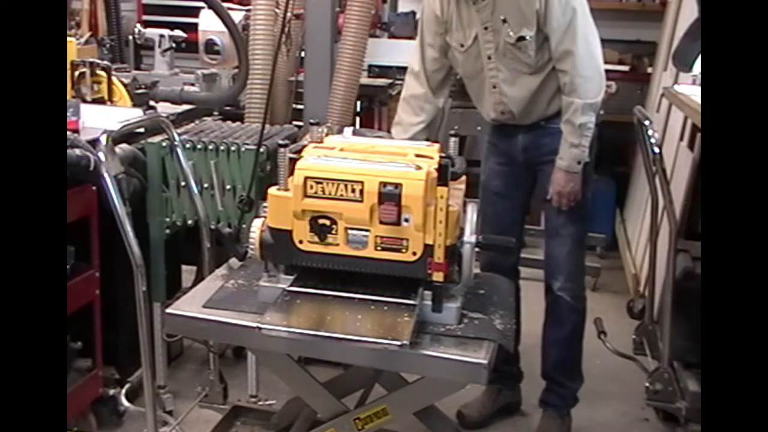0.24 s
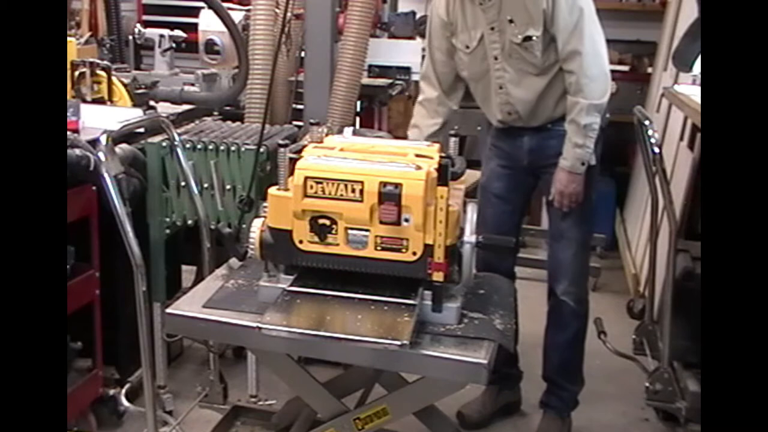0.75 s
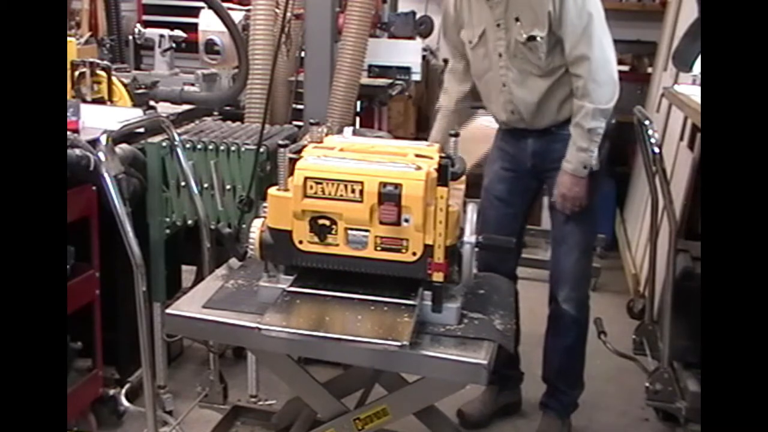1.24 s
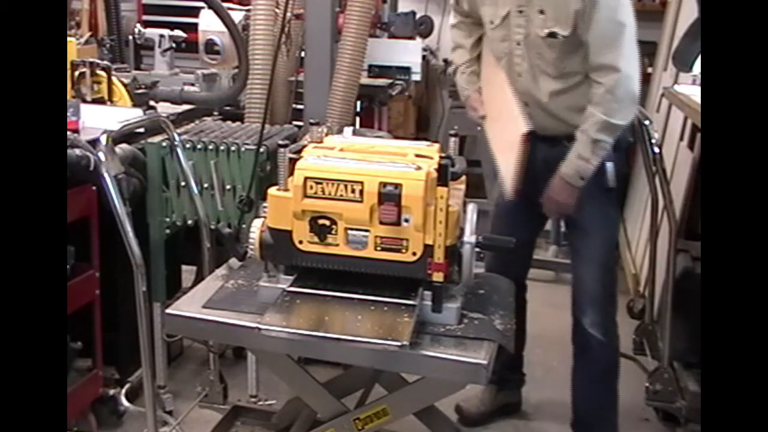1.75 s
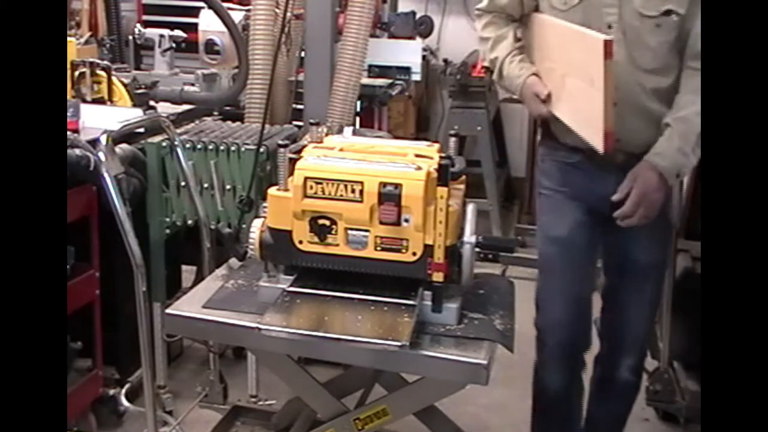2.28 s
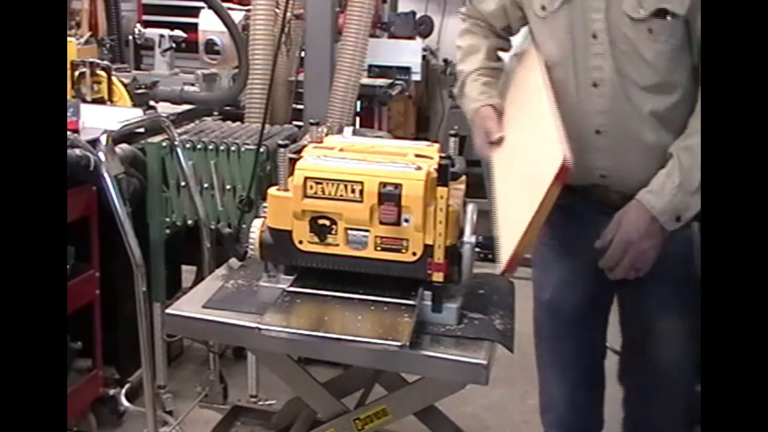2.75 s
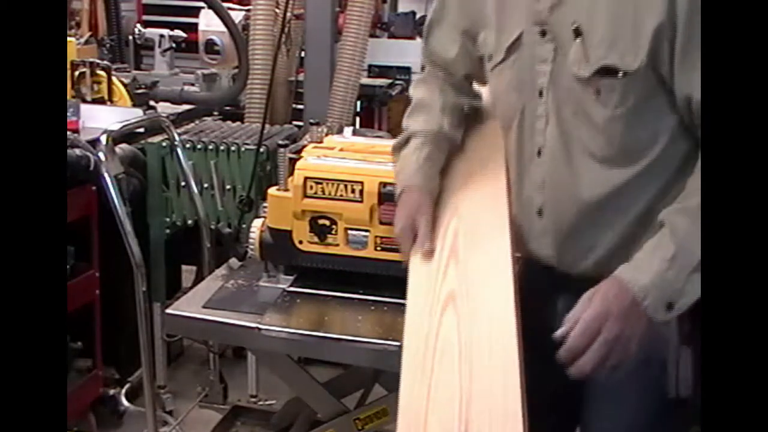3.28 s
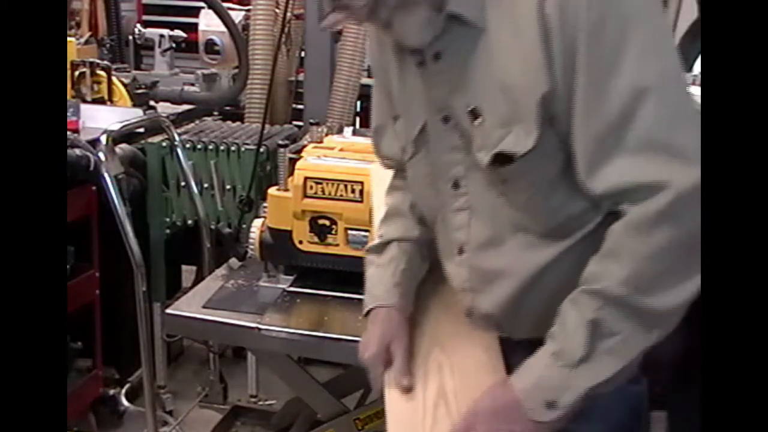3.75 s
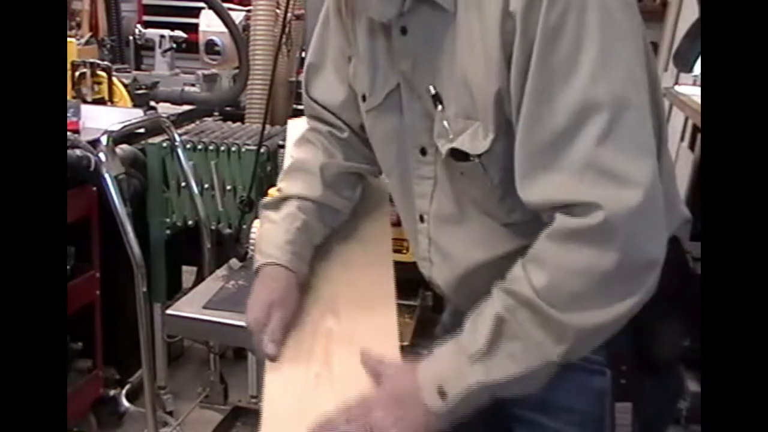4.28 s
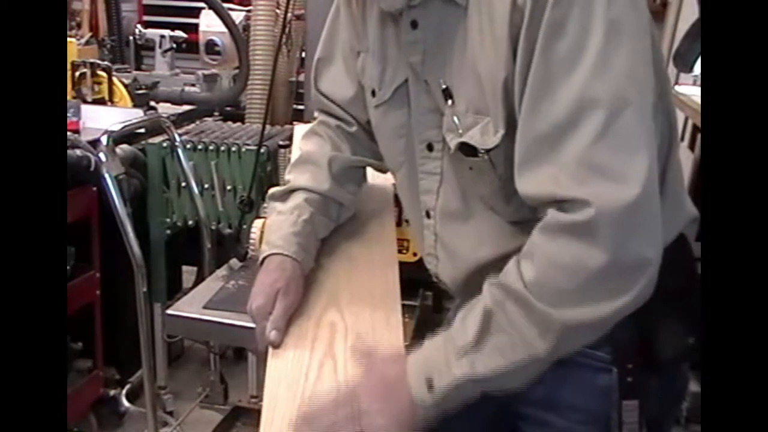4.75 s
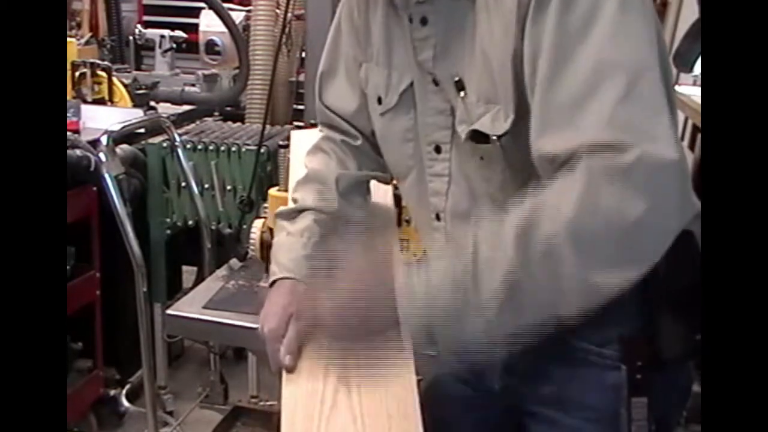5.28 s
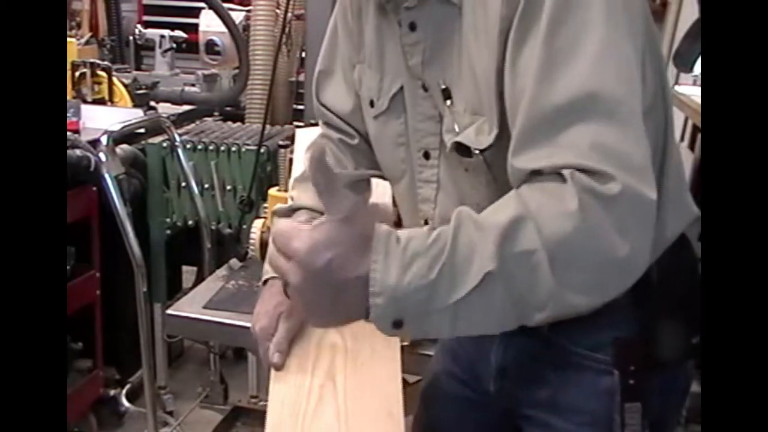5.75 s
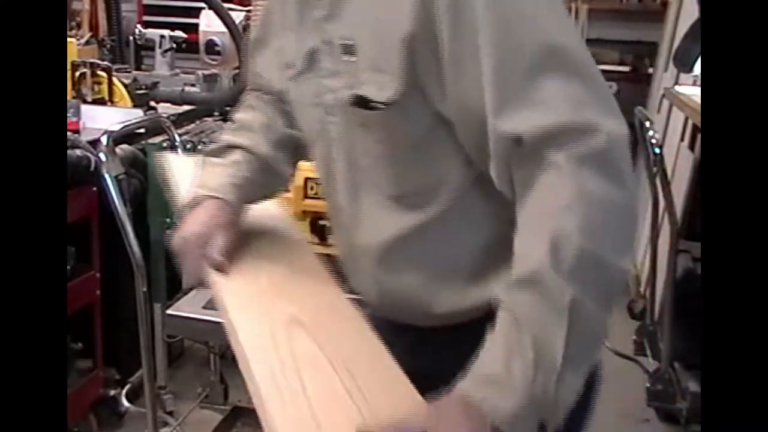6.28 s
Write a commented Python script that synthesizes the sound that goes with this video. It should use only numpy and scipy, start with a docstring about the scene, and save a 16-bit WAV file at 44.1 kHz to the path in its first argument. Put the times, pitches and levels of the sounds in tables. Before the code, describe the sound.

Loud planer whine in a small workshop: a brief cutting rasp, the pitch climbing slightly, then constant free-running drone and airy hiss.

```python
"""A benchtop thickness planer runs in a small workshop: at first the board's tail end rasps off its knives.
Three knives beat the air into a loud whine that climbs as the speed recovers; chips roar in the chute.
The belted motor hums at its turning rate and whistles at multiples of it, while its fan blows turbulent
noise through the casing and narrow resonant bands sing in the slots. A worker walking round with the board
shifts the standing waves of the whine, and a few seconds in shades the treble."""
import sys
import numpy as np
from scipy import signal
from scipy.fft import rfft, irfft, next_fast_len
from scipy.io import wavfile

SR = 44100
rng = np.random.default_rng(int(sys.argv[2]) if len(sys.argv) > 2 else 0)


def wav_record(signal):
    """Record a signal, one row per channel, as 16-bit PCM in the file named by sys.argv[1]."""
    frames = np.transpose(np.atleast_2d(signal))
    bounded = np.clip(frames, -1, 1)
    # unit amplitude maps onto the largest positive 16-bit level
    quanta = np.round(bounded * 32767).astype(np.int16)
    wavfile.write(sys.argv[1], SR, quanta)


N = 287532
T = np.arange(N) / SR   # s

KNIFE_HZ = 513.7   # knife passes per second at free speed
SAG_HZ, RECOVERY_S = 16.3, .47   # pass rate lost under load at the start, and its return time
ROOM_MODE_HZ, ROOM_MODE_WIDTH_HZ = 510.9, 4.0   # a standing wave that the fundamental sweeps through
LOAD_PEAK_S, LOAD_RISE_S, LOAD_FADE_S = .12, .2, .4
MOTOR_PER_KNIFE = .6507   # motor turns per knife pass
LOW_ORDER, MID_ORDER, TOP_ORDER = 8, 16, 21   # whistles, in multiples of the motor turn
WHISTLE_WANDER_DB = 1.2
AIR_DB, OPPOSED_DB = -24.5, -11.5   # broadband noise as a whole; scale of its part in opposite phase
HISS_FROM_HZ, TOP_FROM_HZ = 2000, 5200   # taken to the nearest third-octave patch
SHADE_S, SHADE_RISE_S = 4.15, .08   # the body comes to block the direct path
SHADE_TOP_DB = -2.5   # topmost hiss against the rest once shaded
ROOM_T60_S, ROOM_DB = .25, -13
SLOT_WAVER_DB, ROAR_GUST_DB = 1.8, 1.8
CUT_END_S, CUT_RISE_S = 0.13, 0.12
CUTOFF_HZ = 15650


def from_db(db):
    """Level is logarithmic: 20 dB is a tenfold amplitude."""
    return 10 ** (np.asarray(db) / 20)


def rms_one(x):
    """Mean-square normalisation: scale to unit power."""
    return x / np.sqrt(np.mean(x ** 2) + 1e-20)


def in_time(rows):
    """Linear interpolation of a table's columns, sample by sample."""
    s, *columns = np.transpose(rows)
    return [np.interp(T, s, column) for column in columns]


def drift(rate_hz):
    """Low-passed chance: coarse noise twice through a one-pole filter, scaled to spread 1."""
    step = 40   # samples per coarse point
    pole = np.exp(-2 * np.pi * rate_hz * step / SR)
    noise = rng.standard_normal(N // step + 2002)
    slow = signal.lfilter([1], [1, -2 * pole, pole * pole], noise)[2000:]
    return np.interp(np.arange(N) / step, np.arange(len(slow)), rms_one(slow - slow.mean()))


def bell(hz, centre_hz, width_hz):
    """Power curve of a simple resonance, 1 at its centre."""
    return 1 / (1 + (2 * (hz - centre_hz) / width_hz) ** 2)


def resonant_noise(centre_hz, width_hz):
    """Resonance colours noise: white noise twice through one resonance, at unit power."""
    size = next_fast_len(N)
    hz = np.arange(size // 2 + 1) * SR / size
    spectrum = rfft(rng.standard_normal(size)) * bell(hz, centre_hz, width_hz)
    return rms_one(irfft(spectrum, size)[:N])


def lean(x, pan_db):
    """Interaural level difference places a sound between left and right."""
    return x * from_db(np.array([pan_db, -pan_db]) / 2)


def slowed():
    """Exponential relaxation: 1 under load, dying to 0 as the machine frees itself."""
    return np.exp(-T / RECOVERY_S)


def knife_phase():
    """Phase is the integral of frequency: knife passes while the freed cutter head spins back up."""
    return 2 * np.pi * np.cumsum(KNIFE_HZ - SAG_HZ * slowed()) / SR


def knives(phase, near):
    """Periodic puffs form a harmonic series; moving reflections make its overtones wander in phase."""
    # knife tone in the room's standing waves: t/s, level of orders 1 to 4/dB
    whine_levels = [(0.03, -16, -42, -29.5, -52), (0.1, -15.5, -39, -38, -54), (0.15, -15, -25.5, -34, -61),
                    (0.24, -16, -26.5, -33, -42), (0.33, -14.5, -24.5, -29.5, -36.5),
                    (0.55, -15.5, -28, -27, -37.5), (0.66, -15.5, -26.5, -28, -33.5),
                    (0.76, -15, -27, -38, -34.5), (0.86, -15, -25, -31.5, -31.5),
                    (0.96, -16, -25.5, -30.5, -32.5), (1.11, -16, -25, -29, -29.5),
                    (1.3, -17.5, -23.5, -30, -28.5), (1.77, -17.5, -25.5, -25.5, -28),
                    (1.97, -14.5, -26.5, -33, -32), (2.62, -16.5, -24.5, -28, -29.5),
                    (3.44, -16, -24.5, -30, -33), (3.53, -16, -26.5, -27.5, -30),
                    (3.62, -16, -26, -38, -31.5), (3.84, -15.5, -25.5, -29.5, -26.5),
                    (4.02, -15, -29, -34.5, -34), (4.05, -14.5, -26, -45, -30.5),
                    (4.16, -15, -27, -29.5, -29), (4.95, -16, -24, -33.5, -31),
                    (5.56, -14.5, -24.5, -29, -30), (5.98, -14.5, -25, -31.5, -31.5),
                    (6.05, -15, -26, -39.5, -33), (6.3, -14, -28.5, -30, -33.5),
                    (6.43, -14.5, -28, -33, -32), (6.48, -14, -29, -36, -34.5)]
    # left-right lean of the knife fundamental: t/s, lean/dB
    fundamental_lean = [(0.03, 3.3), (0.14, 1.8), (0.4, 1.8), (1.1, -1.7), (1.8, -1.7), (2.0, -.6),
                        (2.5, -.7), (2.75, -1.6), (3.35, -.2), (4.0, -1.1), (4.25, -.7), (6.48, -.2)]
    # lean of orders 2 to 4: at rest/dB, added while slowed/dB, added by the near worker/dB, wander/dB
    overtone_leans = [(1.1, -1.5, 4.5, 0.1), (-0.5, 11, 2, 2.5), (0.5, -5, 0.4, 0)]
    pans_db = in_time(fundamental_lean)
    for rest_db, slow_db, near_db, wander_db in overtone_leans:
        pans_db.append(rest_db + slow_db * slowed() + near_db * near + wander_db * drift(1.4))
    pass_hz = np.gradient(phase) * SR / (2 * np.pi)
    mode_phase = np.arctan(2 * (pass_hz - ROOM_MODE_HZ) / ROOM_MODE_WIDTH_HZ)
    through_mode = mode_phase - mode_phase[-1]   # the fundamental falls behind as it passes the standing wave
    out = 0
    for k, (level_db, pan_db) in enumerate(zip(in_time(whine_levels), pans_db)):
        wander = .19 * k ** 2 + .2 * k * drift(.8)   # overtones lean ahead, so the puff is lopsided
        if k == 0:
            wander = wander - through_mode
        # the two ports sit apart in the standing wave
        skew = np.array([[.1], [-.1]]) * (1 + 0.15 * k * drift(0.73))
        flutter = from_db((0.3 + 0.35 * k) * drift(13.0) + 0.3 * k * drift(3.0))
        tone = np.sqrt(2) * np.cos((k + 1) * phase + wander + skew)
        out = out + lean(from_db(level_db) * flutter * tone, pan_db)
    return out


def unequal_knives(phase, near):
    """Broken symmetry: unequal knives repeat only once a turn, adding multiples of the cutter turn."""
    # multiple of cutter turn, free level/dB, added as the board tips off/dB, added by the near worker/dB
    turn_orders = [(1, -58, 0, 0), (5, -50, 19, 6), (15, -52, 11, 1), (44, -60, 4, 0)]
    late = T - LOAD_PEAK_S
    load = np.exp(np.where(late < 0, -(late / LOAD_RISE_S) ** 2, -late / LOAD_FADE_S))
    out = 0
    for order, free_db, load_db, near_db in turn_orders:
        waver_db = 2.6 * (1.3 - load) * drift(2.5)   # steadier under load
        level_db = free_db + load_db * load + near_db * near + waver_db
        out = out + np.sqrt(2) * from_db(level_db) * np.cos(order * phase / 3)
    return out


def motor(phase):
    """Rotating unbalance hums once and twice a turn; fan blades and slots add thin higher orders."""
    # hum once a turn: t/s, level/dB
    hum_levels = [(0.03, -42), (0.12, -33), (0.84, -32.5), (0.95, -27.5), (1.83, -29), (1.86, -32.5),
                  (2.69, -29.5), (2.94, -31), (4.25, -26.5), (4.29, -29.5), (5.99, -28), (6.39, -30),
                  (6.43, -27), (6.48, -30)]
    # hum twice a turn: t/s, level/dB
    second_hum_levels = [(0, -49), (.25, -45), (1.5, -46), (2.5, -50), (2.66, -40), (3.0, -44), (3.3, -50),
                         (6.5, -50)]
    # the lowest whistle swells under load and again as the worker bends over the board: t/s, level/dB
    low_levels = [(0, -44), (.2, -37.5), (.45, -37), (.68, -48), (.88, -42), (1.1, -48), (1.5, -52),
                  (3.4, -51), (3.8, -43.5), (4.15, -44), (4.45, -49), (4.8, -44), (5.3, -43.5),
                  (5.8, -39.5), (6.1, -42), (6.4, -46)]
    # the middle fan whistle: free level/dB, swell/dB, swell peak/s, swell width/s
    mid_swell = (-51.5, 16, .2, 0.24)
    # the highest whistle comes and goes: t/s, level/dB
    top_levels = [(0, -52), (.5, -50), (1.07, -41), (1.5, -48), (2.0, -52), (2.8, -49), (4.0, -52),
                  (4.3, -59), (5.0, -53), (5.9, -49), (6.1, -56), (6.5, -56)]
    turn = MOTOR_PER_KNIFE * phase
    out = from_db(in_time(hum_levels)[0] + 0.51 * drift(12.0)) * np.cos(turn)
    out = out + from_db(in_time(second_hum_levels)[0] + 3.0 * drift(8.5)) * np.cos(2 * turn)
    low_db = in_time(low_levels)[0] + 1.5 * drift(10.0)
    out = out + from_db(low_db) * np.cos(LOW_ORDER * turn + 0.3 * drift(12))
    free_db, swell_db, peak_s, width_s = mid_swell
    mid_db = free_db + swell_db * np.exp(-((T - peak_s) / width_s) ** 2)
    mid_db = mid_db + WHISTLE_WANDER_DB * drift(1.2) + 1.5 * drift(14)
    out = out + from_db(mid_db) * np.cos(MID_ORDER * turn + 0.3 * drift(12))
    top_db = in_time(top_levels)[0] + 2.9 * drift(9.6)
    out = out + from_db(top_db) * np.cos(TOP_ORDER * turn + 0.4 * drift(12))
    return np.sqrt(2) * out


def air(phase, *levels_db):
    """Turbulence is broadband noise, here in third-octave patches; each knife puffs the hiss a little."""
    # turbulent air heard alike in both ears: f/Hz, relative level per Hz/dB
    rush_curve = [(30, -38), (90, -28), (130, -16.5), (240, -7.5), (380, -4), (600, 0), (1100, -2),
                  (1900, -5.5), (2500, -7.5), (3400, -8), (4500, -5.5), (6500, -10), (7570, -15),
                  (7640, -28), (8300, -33), (9000, -46), (15500, -54)]
    # noise in opposite phase between the ears, with a step up above 7.6 kHz: f/Hz, relative level per Hz/dB
    opposed_curve = [(30, -33), (90, -40.5), (240, -12), (600, -3), (1300, 2.5), (2500, -5.5),
                     (5000, -10.5), (7500, -24), (7620, -2), (9500, -8.5), (11500, -11.5), (13500, -23),
                     (15500, -33.5)]
    # resonances and dips in the shared air noise, from the casing and the room: f/Hz, width/Hz, lift/dB
    resonance_bells = [(120, 10, 4), (200, 30, 7), (287, 30, 7), (232, 25, -6), (385, 35, -3), (420, 35, 6),
                       (468, 25, 3), (560, 50, -2), (620, 70, -4), (700, 40, -3), (742, 16, -4), (908, 16, -6),
                       (1095, 25, 5), (1195, 60, 4), (1605, 90, 3), (2215, 110, -3), (2360, 80, 4),
                       (4060, 80, -2), (5200, 60, 3), (1275, 40, 4), (1330, 25, -4), (3010, 90, 3),
                       (3190, 25, 4), (3480, 220, -4), (3830, 200, 3), (4480, 420, 4), (4740, 100, -2),
                       (4930, 100, -2), (5050, 100, 2), (5830, 220, -3), (5990, 70, 4), (6280, 200, 3),
                       (6570, 450, -4), (7080, 350, 4)]
    size = next_fast_len(N)
    hz = np.maximum(np.arange(size // 2 + 1) * SR / size, 20)
    gains = []
    for curve in (rush_curve, opposed_curve):
        curve_hz, curve_db = np.transpose(curve)
        gains.append(from_db(np.interp(np.log(hz), np.log(curve_hz), curve_db)))
    shared, opposed = gains
    for centre_hz, width_hz, lift_db in resonance_bells:
        shared = shared * from_db(lift_db * bell(hz, centre_hz, width_hz))
    filters = [shared * walls(size, hz), opposed * from_db(OPPOSED_DB)]
    spectra = rfft(rng.standard_normal((2, size))) * filters
    bands, place = [], np.clip(3 * np.log2(hz / 120), 0, 21)   # third-octaves above 120 Hz
    for k in range(22):
        window = np.clip(1 - np.abs(place - k), 0, 1)   # neighbours cross-fade
        flicker_db = .6 + 2 * (k > 18)   # the topmost treble flickers
        patch = from_db(0.5 * drift(3.9) + flicker_db * drift(30))
        bands.append(patch * irfft(spectra * window, size)[:, :N])
    hiss_at, top_at = (round(3 * np.log2(edge_hz / 120)) for edge_hz in (HISS_FROM_HZ, TOP_FROM_HZ))
    rush, hiss, top = sum(bands[:hiss_at]), sum(bands[hiss_at:top_at]), sum(bands[top_at:])
    puff = 1 + .06 * np.cos(phase)
    swells = [from_db(level_db - level_db.mean()) for level_db in levels_db]
    mid, side = swells[0] * rush + puff * (swells[1] * hiss + swells[2] * top)
    return from_db(AIR_DB) * np.array([mid + side, mid - side]) / mid.std()


def walls(size, hz):
    """Reverberant decay: the direct sound plus dense dying echoes of near walls and benches."""
    t = np.arange(SR // 2) / SR
    echoes = rng.standard_normal(len(t)) * from_db(-60 * t / ROOM_T60_S)
    duller = np.sqrt(bell(hz, 2200, 5200))   # shelves and clutter swallow the treble
    return 1 + from_db(ROOM_DB) * duller * rfft(echoes / np.sqrt(np.sum(echoes ** 2)), size)


def slots(shade):
    """Narrow-band resonance: air through the casing slots sings in bands that waver in strength."""
    # airy notes of the casing slots: f/Hz, width/Hz, level/dB, change once shaded/dB
    slot_notes = [(1370, 60, -42, -8), (1420, 45, -50, 8), (1605, 70, -46, -5), (3006, 24, -43.5, -4),
                  (3795, 50, -49, -4), (4430, 30, -48, -3), (4515, 25, -46.5, -3), (4595, 25, -48, -5),
                  (5042, 35, -48.5, -4)]
    out = 0
    for centre_hz, width_hz, level_db, shade_db in slot_notes:
        gain = from_db(level_db + shade_db * shade + SLOT_WAVER_DB * drift(3.1))
        out = out + gain * resonant_noise(centre_hz, width_hz)
    return out


def chute():
    """Duct resonance: the chip chute roars in a few rough notes, each gusting on its own."""
    # the chute roars while chips clear: t/s, level/dB
    roar_levels = [(0, -26), (.25, -33), (.4, -29.5), (1.3, -33.5), (1.9, -33.5), (2.3, -37.5),
                   (2.5, -32.5), (2.95, -35), (3.3, -41.5), (6.5, -42)]
    # rough notes of the chute: f/Hz, width/Hz, share/dB
    chute_notes = [(765, 35, -8), (815, 50, -6), (878, 35, -8)]
    roar_db = in_time(roar_levels)[0]
    out = 0
    for centre_hz, width_hz, share_db in chute_notes:
        gain = from_db(roar_db + share_db + ROAR_GUST_DB * drift(4.1))
        out = out + gain * resonant_noise(centre_hz, width_hz)
    return out


def cut():
    """Damped resonance: the board's tail end rasps up as it tips off the knives, then dies away."""
    # the last of the cut, noise ringing in board and knives: f/Hz, width/Hz, level/dB, fade/s
    cut_rings = [(1620, 320, -31.5, .3), (5290, 480, -27.5, .15)]
    late = T - CUT_END_S
    out = 0
    for centre_hz, width_hz, level_db, fade_s in cut_rings:
        swell = np.exp(np.where(late < 0, late / CUT_RISE_S, -late / fade_s))
        out = out + from_db(level_db) * swell * resonant_noise(centre_hz, width_hz)
    return out


def scene():
    """Superposition of the sources; one belt locks knife and motor tones to a single phase."""
    # worker beside the line of sight: t/s, nearness/0-1
    worker_nearness = [(0, 0), (3.2, 0), (3.7, 0.9), (4.1, 1.0), (6.15, 1.0), (6.5, 0)]
    # course of the broadband noise, each column heard about its mean: t/s, hiss level/dB, low rush level/dB
    blow_levels = [(0.02, -24, -31), (0.3, -27.5, -32), (0.85, -27.5, -33), (1.05, -26.5, -31.5),
                   (1.45, -27.5, -32.5), (1.8, -27.5, -32), (1.9, -30, -35.5), (2.4, -29.5, -34.5),
                   (2.7, -27.5, -33.5), (2.9, -29, -33.5), (3.8, -29, -33.5), (4.02, -29, -32),
                   (4.27, -30, -33), (5.0, -29.5, -32.5), (6.0, -29.5, -32.5), (6.48, -31, -33)]
    phase = knife_phase()
    near = in_time(worker_nearness)[0]
    hiss_db, rush_db = in_time(blow_levels)
    shade = (1 + np.tanh((T - SHADE_S) / SHADE_RISE_S)) / 2
    tones = knives(phase, near) + unequal_knives(phase, near) + motor(phase)
    blown = air(phase, rush_db, hiss_db, hiss_db + SHADE_TOP_DB * shade)
    return tones + blown + slots(shade) + chute() + cut()


def record(dry):
    """Low-pass filtering: a steep elliptic filter cuts the top."""
    return signal.sosfilt(signal.ellip(12, .5, 70, CUTOFF_HZ, fs=SR, output="sos"), dry)


dry = scene()
out = record(dry)
wav_record(out)
```